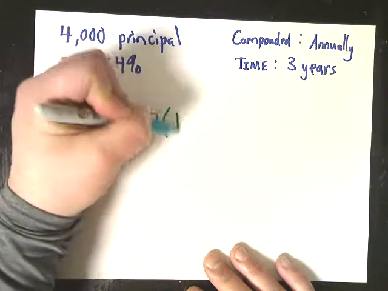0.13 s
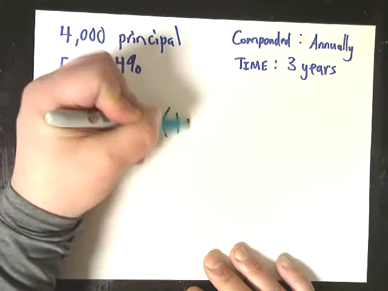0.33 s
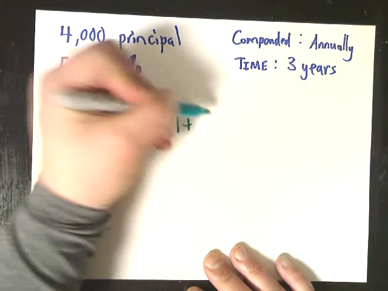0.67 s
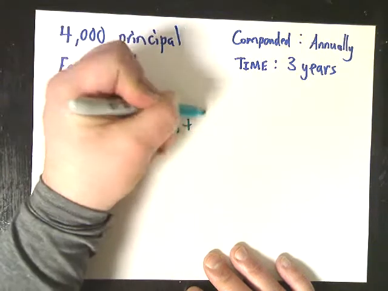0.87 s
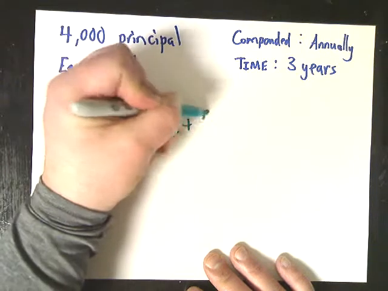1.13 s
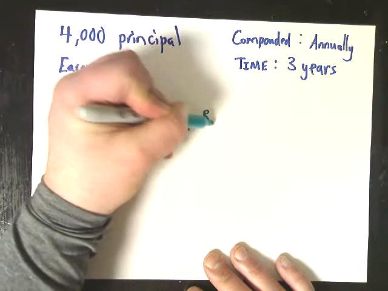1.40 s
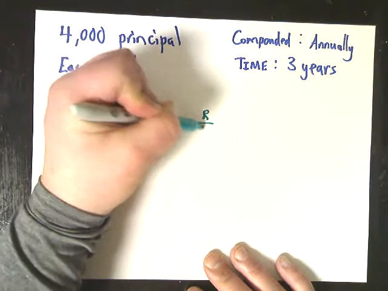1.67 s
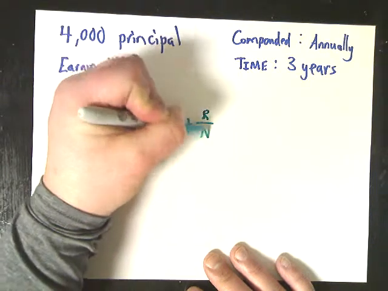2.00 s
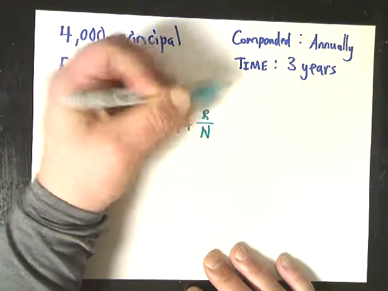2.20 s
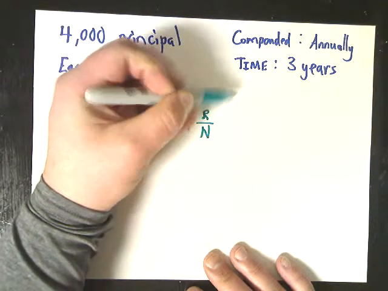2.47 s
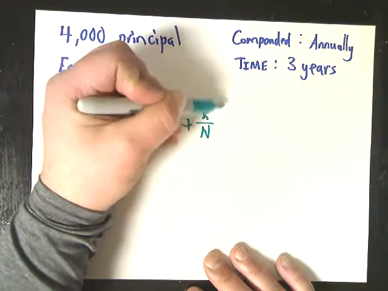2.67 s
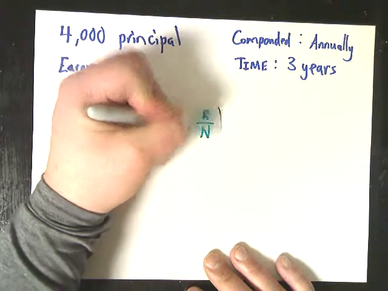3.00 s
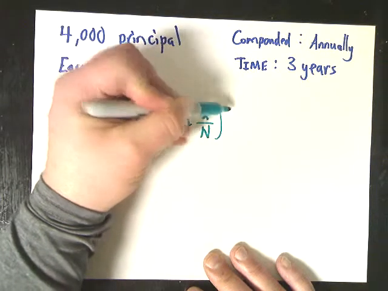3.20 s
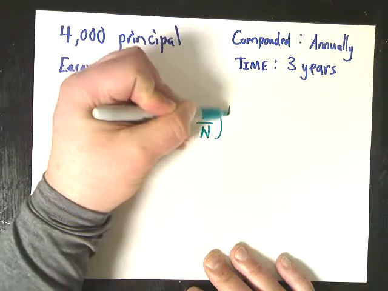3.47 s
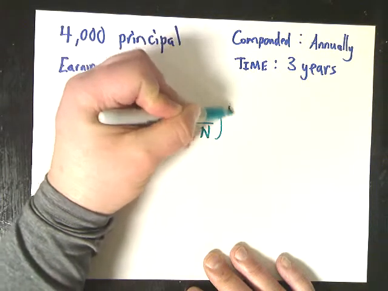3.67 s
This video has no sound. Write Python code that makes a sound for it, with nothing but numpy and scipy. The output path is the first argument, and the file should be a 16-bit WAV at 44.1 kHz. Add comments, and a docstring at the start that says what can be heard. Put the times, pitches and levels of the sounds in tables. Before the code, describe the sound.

Short rubs of a felt marker on paper come in uneven clusters, mixed with tip taps, hand slides and a few soft desk bumps. Behind them are a dull microphone's steady hiss, low rumble and faint buzz in a quiet room.

```python
"""A desk in a quiet room: a felt marker writes a short formula on a sheet of paper.
The tip lands with a soft tap, rubs over the paper fibres in quick strokes and snags on a few.
The hand slides along the sheet and bumps the desk.
Behind it lie a mains buzz, a low rumble and the steady hiss of a small, dull microphone."""
import sys
import numpy as np
from scipy import signal
from scipy.fft import rfft, irfft, next_fast_len
from scipy.io import wavfile
from scipy.ndimage import map_coordinates

SR = 44100
rng = np.random.default_rng(int(sys.argv[2]) if len(sys.argv) > 2 else 0)


def dump_mix(stems):
    """Bounce the given channels to the path in sys.argv[1] as a 16-bit WAV at rate SR."""
    frames = np.atleast_2d(stems).T  # one column per channel
    limited = np.clip(frames, -1, 1)  # hard clip at full scale
    pcm = np.round(limited * 32767).astype(np.int16)
    wavfile.write(sys.argv[1], SR, pcm)


N = 169785

# Spectra of the rub, its top hiss and the sheet's body (frequency [Hz], gain [dB])
RUB_SPECTRUM = [(300, -41), (1500, -5), (2500, -6.5), (3100, -4), (3600, -7.5), (4500, 3), (5100, 0.5),
                (6000, 1.5), (6900, -18), (7500, -6), (8200, -39.5)]
HISS_SPECTRUM = [(3000, -48), (5600, -8.5), (6200, -6.5), (6600, -5.5), (7000, -6), (7400, -22),
                 (7900, -27), (8600, -44)]
SHEET_SPECTRUM = [(100, -11), (400, -5), (650, 0.5), (950, -5.5), (1230, 0.5), (1600, -11), (2300, -18),
                  (3400, -15.5), (4500, -20.5), (8000, -50)]
# Strokes (start [s], length [s], attack [share], level [dB], tip resonance [Hz], tip [dB],
# barrel [dB], top hiss [dB], sheet [dB], notch [Hz], notch gain [dB])
TIP_STROKES = [ (-.02, 0.078, .3, -64, 4130, 0, -19, 2.5, -6, 5200, -2),
               (0.188, 0.026, .15, -70, 5100, -4, -16, -8, -7, 6200, -3),
               (0.212, 0.066, 0.25, -64.5, 4120, -8, -18, 1, -15, 5270, 1),
               (0.357, 0.13, 0.26, -70.5, 5140, -3, -18, -8, -14, 3700, -3),
               (0.48, 0.12, 0.26, -69.5, 5830, -2, -7, -6.5, -21, 3450, -8),
               (.773, 0.049, 0.23, -69.5, 4870, -4, -10, 2.5, -4, 5900, -4),
               (0.894, 0.11, 0.14, -74, 5200, -4, -5, -9, 8.5, 5960, -4),
               (.993, 0.028, .35, -69.5, 5460, -7, -6, 4, 7, 6100, -8),
               (1.098, 0.073, 0.3, -65.5, 5450, 0, -3.5, -3.5, 4.5, 4000, 0),
               (1.353, 0.11, 0.53, -68.5, 5380, -2.5, -9, -14, -17, 4200, -5),
               (1.596, 0.064, 0.17, -64, 5500, -4, -24, 1, -7, 6000, -11),
               (1.762, 0.053, 0.55, -70, 5540, -7, -6, -9, 3.5, 6100, -6),
               (1.797, 0.071, 0.28, -63, 5500, 0.5, -4, 0.5, 1.5, 6060, -13),
               (1.896, 0.025, .15, -61, 5500, 4.5, -22, 0, -3, 5940, -7),
               (1.915, 0.023, .3, -66.5, 5360, -3, -11, 0.5, -14, 6050, -7),
               (2.03, .15, 0.18, -76, 4800, -1, -12, -13, -11, 6130, -1),
               (2.15, 0.033, 0.5, -69.5, 2630, 2, -4, -21, -10, 5930, -15),
               (2.857, 0.09, 0.34, -64, 5470, 1, -7, 3, -8, 5800, -3.5),
               (2.936, .05, .2, -77, 5200, -2, -9, -4, -10, 5850, -5),
               (3.309, 0.043, .35, -73.5, 5500, -4, -18, 3, -18, 4830, 4),
               (3.353, .03, .3, -77, 5550, -6, -16, 0, -6, 4800, -2),
               (3.519, 0.068, 0.23, -67.5, 6160, -3, -4, -0.5, -2.5, 4900, -10),
               (3.623, 0.031, .2, -63, 5800, -7, -14, 1, -12, 5150, -1),
               (3.647, 0.031, 0.21, -66.5, 5500, -10, -8, 1.5, -9, 5900, -7)]
def strokes():
    """Felt rubs paper; tip and barrel ring, and the hand's reflection shapes one band per stroke."""
    barrel_hz, notch_width_hz, judder_db = 3516, 163, 1
    out = np.zeros(N)
    for (start_s, length_s, attack, level_db, tip_hz, tip_db,
         barrel_db, hiss_db, sheet_db, notch_hz, notch_db) in TIP_STROKES:
        tip = amp(tip_db) * squeak(tip_hz, width_hz=290)
        barrel = amp(barrel_db) * squeak(barrel_hz, width_hz=260)
        rub = coloured(friction(), RUB_SPECTRUM)
        hiss = amp(hiss_db) * coloured(friction(), HISS_SPECTRUM)
        sheet = amp(sheet_db) * coloured(friction(), SHEET_SPECTRUM)
        notch = lambda f: amp(notch_db * np.exp(-0.5 * ((f - notch_hz) / notch_width_hz) ** 2))
        stroke = filtered(reflected(tip + barrel + rub + hiss + sheet), notch)
        add(out, start_s, amp(level_db) * speed(length_s, attack) * stroke)
    return out * amp(judder_db * wobble(knots_per_s=90))


def friction(slips_per_s=3500, spread_db=3, smooth_share=0.36):
    """Half a second of tiny fibre slips over a smooth rub."""
    n = SR // 2
    slips = (rng.random(n) < slips_per_s / SR) * amp(spread_db * rng.standard_normal(n))
    slips *= np.sign(rng.standard_normal(n))
    return np.sqrt(1 - smooth_share) * unit(slips) + np.sqrt(smooth_share) * rng.standard_normal(n)


def squeak(hz, width_hz):
    """Friction rings in one steep resonance."""
    return unit(resonant(resonant(friction(), hz, 2 * width_hz), hz, 2 * width_hz))


def speed(length_s, attack_share, release_share=0.43):
    """One movement speeds up, holds and slows down."""
    progress = np.arange(SR // 2) / SR / length_s
    ramp = np.minimum(progress / attack_share, (1 - progress) / release_share)
    return np.sin(np.pi / 2 * np.clip(ramp, 0, 1))


def reflected(x, gain=0.39):
    """One close reflection between pen, hand and desk; its path varies with the grip."""
    delay_s = rng.uniform(0.001209, 0.0026)
    return filtered(x, lambda f: (1 + gain * np.exp(-2j * np.pi * f * delay_s)) / np.hypot(1, gain))


# Tick filter (frequency [Hz], gain [dB])
TICK_RESPONSE = [(1200, -27), (2600, 1.5), (7000, -0.5), (7800, -8), (8600, -25), (9500, -45)]
# Snags (time [s], level [dB], pitch [Hz])
FIBRE_SNAGS = [(0.261, -45.5, 4400), (0.283, -55, 4800), (0.3476, -42.5, 5940), (.368, -56, 4000),
               (.458, -59, 4300), (.473, -45, 4660), (0.519, -52, 3000), (0.53, -57, 3000),
               (1.354, -55, 2880), (2.165, -49, 3800)]
def snags(t60_s=0.0075):
    """Dry ticks as the tip catches on a fibre and lets go."""
    out, t = np.zeros(N), np.arange(SR // 20) / SR
    for time_s, level_db, hz in FIBRE_SNAGS:
        burst = rng.standard_normal(len(t)) * amp(-60 * t / t60_s)
        tick = resonant(burst, hz, width_hz=0.42 * hz)
        add(out, time_s, amp(level_db) * tick / np.abs(tick).max())
    return filtered(out, lambda f: amp(np.interp(f, *np.transpose(TICK_RESPONSE))))


# Modes of a tap (frequency [Hz], level [dB], T60 [s])
LANDING_MODES = [(237, -7, 0.038), (418, 3, 0.018), (532, -2.5, 0.057), (630, -3.5, .03), (876, -11, 0.012),
                 (1440, -12, .012)]
# Landings (time [s], level [dB])
TIP_LANDINGS = [(.189, -46.5), (.791, -55.5), (1.3257, -49.5), (1.577, -51)]
def taps():
    """The tip lands on the sheet with a light tap."""
    out = np.zeros(N)
    for time_s, level_db in TIP_LANDINGS:
        add(out, time_s, amp(level_db) * ring(LANDING_MODES))
    return out


# Desk modes (frequency [Hz], level [dB], T60 [s])
DESKTOP_MODES = [(67, 6, 0.069), (115.6, 3.5, 0.084), (228, 4.5, 0.023), (299.5, -1.5, 0.092),
                 (730, -5.5, 0.061), (1153, -6.5, 0.02)]
# Bumps (time [s], level [dB], hardness [dB/octave])
HAND_BUMPS = [(.791, -47.5, 1), (1.577, -57.5, -1), (3.068, -47.5, -12.5)]
def bumps():
    """The hand bumps the desk; a harder blow favours the upper modes."""
    out = np.zeros(N)
    for time_s, level_db, hardness in HAND_BUMPS:
        add(out, time_s, amp(level_db) * ring(DESKTOP_MODES, hardness))
    return out


def ring(modes, tilt_db_per_octave=0, contact_s=0.00038):
    """Damped modes after a soft blow, tilted from the lowest mode up."""
    t = np.arange(SR // 4) / SR
    tones = np.zeros(len(t))
    for hz, level_db, t60_s in modes:
        tilt_db = tilt_db_per_octave * np.log2(hz / modes[0][0])
        tones += amp(level_db + tilt_db - 60 * t / t60_s) * np.sin(2 * np.pi * hz * t)
    return tones * (1 - np.exp(-t / contact_s))


# Spectra of skin on paper and of the desk's rumble (frequency [Hz], gain [dB])
SKIN_SPECTRUM = [(100, 0), (500, 6), (1200, 0), (2000, -5.5), (3200, -3.5), (5500, -12), (7000, -18.5),
                 (8200, -41)]
RUMBLE_SPECTRUM = [(15, -12.5), (35, 10), (65, -8), (100, -7), (150, -8.5), (300, -39), (1000, -74)]
# Slides (start [s], length [s], brush [dB], rumble [dB])
HAND_SLIDES = [(0.383, 0.085, -70, -56), (.9, 0.4, -70.5, -84), (1.296, 0.14, -69.5, -62),
               (1.931, 0.146, -80, -56.5), (2.05, 0.25, -72.5, -66), (3.131, 0.22, -70, -64)]
def slides():
    """The side of the hand brushes the sheet and shudders on the desk."""
    out = np.zeros(N)
    for start_s, length_s, brush_db, rumble_db in HAND_SLIDES:
        brush = amp(brush_db) * coloured(friction(), SKIN_SPECTRUM)
        rumble = amp(rumble_db) * coloured(friction(), RUMBLE_SPECTRUM)
        add(out, start_s, speed(length_s, attack_share=0.61) * (brush + rumble))
    return out


def room(x, t60_s=0.2, predelay_s=0.004):
    """The short diffuse tail of a small room."""
    t = np.arange(SR // 3) / SR
    tail = rng.standard_normal(len(t)) * amp(-60 * t / t60_s) * (t > predelay_s)
    return signal.fftconvolve(x, tail / np.linalg.norm(tail))[:N]


# Mains buzz (harmonic [number], relative level [dB])
MAINS_HARMONICS = [(4, -77), (6, -76), (7, -79.5), (8, -77.5), (9, -82), (11, -79), (13, -73), (15, -75),
                   (18, -80), (19, -82.5), (21, -83.5), (22, -88), (23, -87), (25, -88.5)]
# Electronic whine (frequency [Hz], level [dB])
WHINE_TONES = [(4132, -95.5), (5375, -94), (6475, -98), (6665, -95), (12100, -93)]
def electronics(mains_hz=59.16, buzz_db=-2):
    """Mains harmonics buzz under a faint high whine."""
    buzz = sum(tone(round(harmonic) * mains_hz, db) for harmonic, db in MAINS_HARMONICS)
    whine = sum(tone(hz, db) for hz, db in WHINE_TONES)
    return amp(buzz_db) * buzz + whine


# Noise floor (frequency [Hz], gain [dB])
FLOOR_SPECTRUM = [(10, 19), (25, 13), (40, 13), (70, 3.5), (105, 2.5), (160, -3), (215, -2), (310, -1),
                  (430, -6.5), (600, -4.5), (800, -3.5), (1000, -10.5), (1400, -11.5), (2100, -15),
                  (3300, -16.5), (5500, -17), (6500, -18.5), (7200, -23.5), (7900, -32), (8600, -42),
                  (16000, -52)]
def noise_floor(bass_hz=200, swell_db=4):
    """Steady microphone hiss over a rumble that swells and sinks at random."""
    noise = coloured(rng.standard_normal(N), FLOOR_SPECTRUM)
    bass = filtered(noise, lambda f: 1 / (1 + (f / bass_hz) ** 8))
    swell = unit(amp(swell_db * wobble(knots_per_s=14)))
    return noise + bass * (swell - 1)


def tone(hz, rms_db, waver_db=0.26):
    """A sine whose level wavers slightly."""
    t = np.arange(N) / SR
    peak = np.sqrt(2) * amp(rms_db - waver_db * wobble(knots_per_s=3.23))
    return peak * np.sin(2 * np.pi * (hz * t + rng.random()))


def amp(db):
    """Decibels to gain."""
    return 10 ** (np.asarray(db) / 20)


def unit(x):
    """Scale to rms 1."""
    return x / np.sqrt(np.mean(x ** 2) + 1e-20)


def filtered(x, response):
    """x through a frequency response."""
    size = next_fast_len(len(x) + 8192)
    return irfft(rfft(x, size) * response(np.fft.rfftfreq(size, 1 / SR)), size)[:len(x)]


def coloured(x, spectrum):
    """x through a (frequency [Hz], gain [dB]) curve, at rms 1."""
    hz, db = np.transpose(spectrum)
    return unit(filtered(x, lambda f: amp(np.interp(np.log(f + 1), np.log(hz + 1), db))))


def resonant(x, hz, width_hz):
    """x through one resonance."""
    return filtered(x, lambda f: 1j * f * width_hz / (hz * hz - f * f + 1j * f * width_hz))


def wobble(knots_per_s):
    """A smooth random curve."""
    knots = rng.standard_normal(int(N * knots_per_s / SR) + 4)
    return map_coordinates(knots, [np.arange(N) * knots_per_s / SR])


def add(out, start_s, x):
    """Mix x into out from start_s."""
    i = round(start_s * SR)
    x = x[max(-i, 0):N - i]
    out[max(i, 0):][:len(x)] += x


def scene():
    """Pen and hand in the room, over the background; mono."""
    room_db, floor_db = -12, -58
    writing = strokes() + snags() + taps() + bumps() + slides()
    reverb = amp(room_db) * room(writing)
    background = electronics() + amp(floor_db) * noise_floor()
    return (writing + reverb + background)[None]


def record(dry):
    """The microphone rolls off steeply in the treble; the recorder adds a DC offset."""
    cutoff_hz, dc_offset = 12300, 0.0438
    hz, db = [0, 7300, 8300, 9000, 11500, 12000], [1, -1, -0.5, -6.5, -6, -2]
    response = lambda f: amp(np.interp(f, hz, db)) * (f < cutoff_hz)
    return np.array([filtered(x, response) for x in dry]) + dc_offset


dry = scene()
out = record(dry)
dump_mix(out)
```